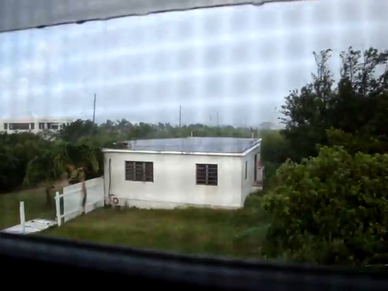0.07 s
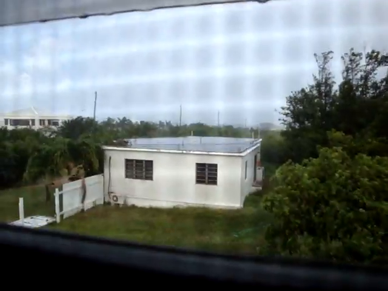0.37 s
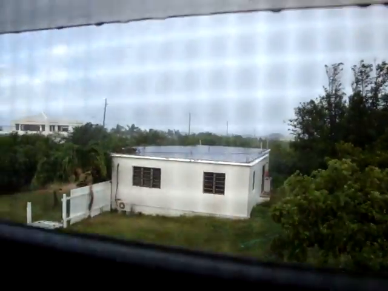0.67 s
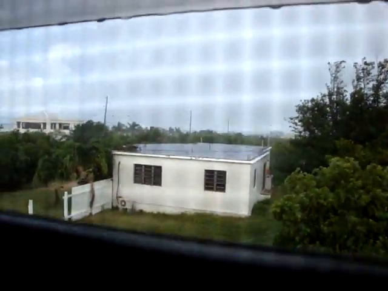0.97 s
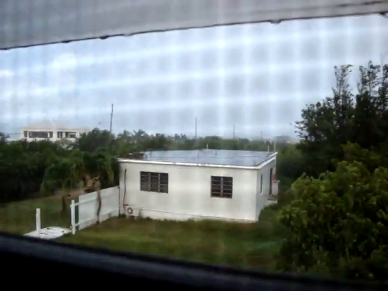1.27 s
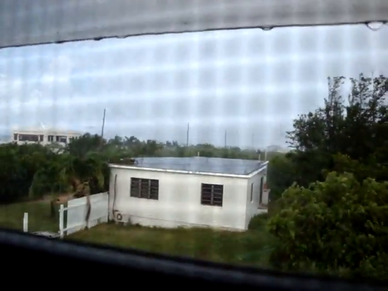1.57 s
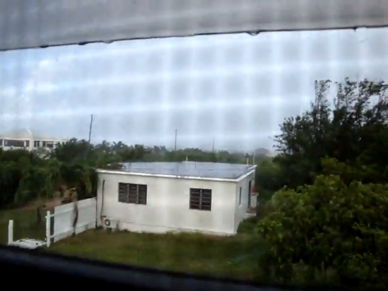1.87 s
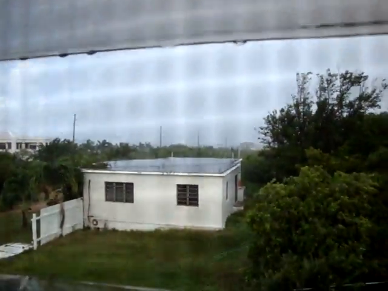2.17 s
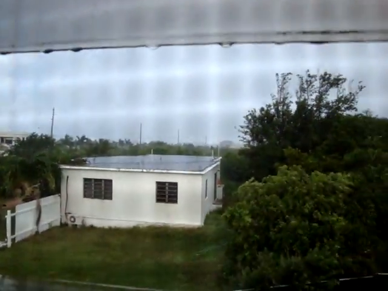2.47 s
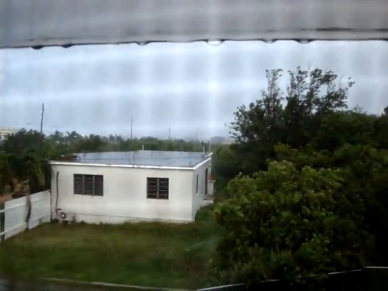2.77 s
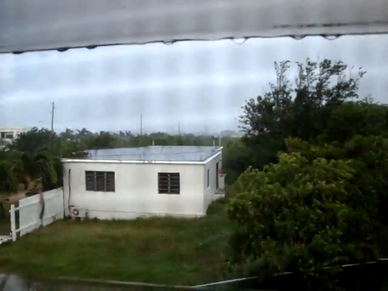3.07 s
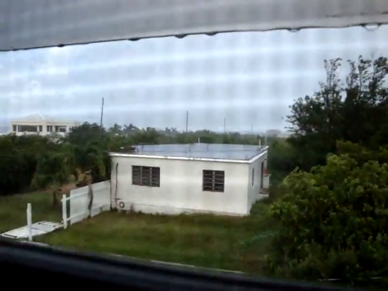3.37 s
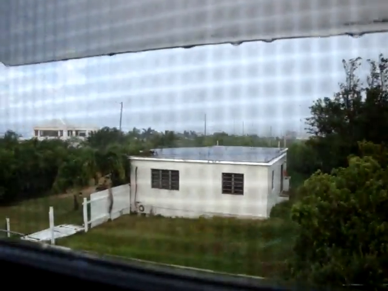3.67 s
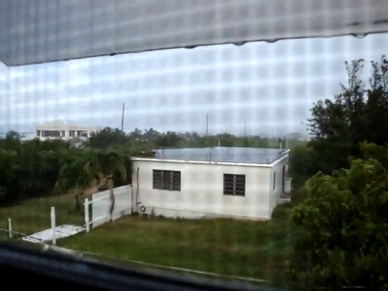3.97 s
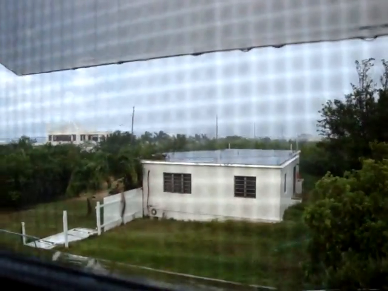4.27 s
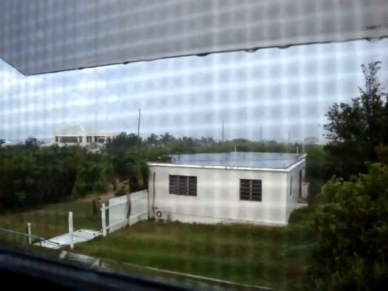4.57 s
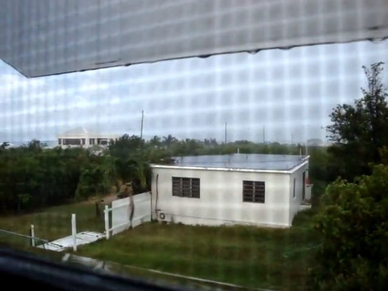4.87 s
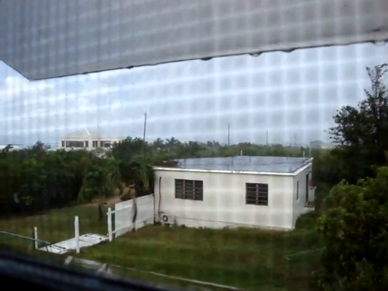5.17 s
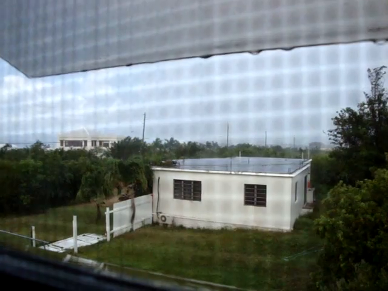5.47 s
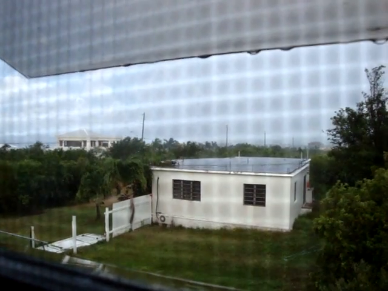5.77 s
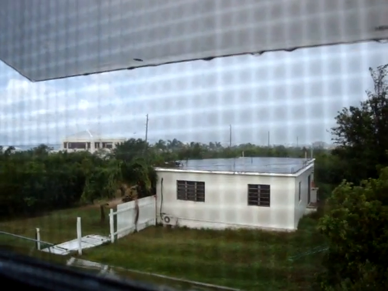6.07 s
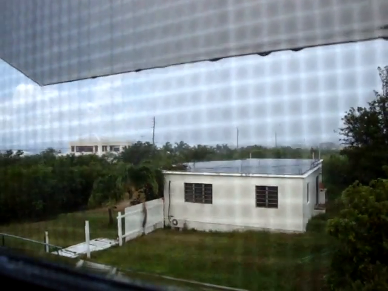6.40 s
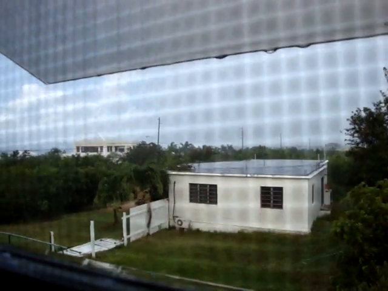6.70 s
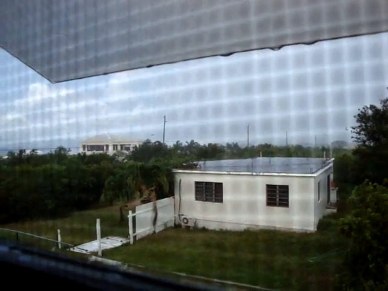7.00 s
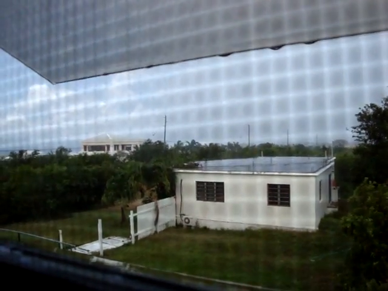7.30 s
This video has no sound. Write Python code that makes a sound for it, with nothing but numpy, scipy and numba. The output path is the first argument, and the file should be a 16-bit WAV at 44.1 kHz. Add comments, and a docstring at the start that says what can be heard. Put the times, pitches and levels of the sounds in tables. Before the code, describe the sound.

Steady rain falls on a lawn and trees, heard from an open window with a faint motor hum underneath. Early on, drops ping on a metal slat and the window gives a light tick. Gusts then buffet the microphone with low thumps and cracks, strongest at about two and a half seconds. In the lull the hum swells briefly and two more drops land, before weaker gusts return near the end.

```python
"""Steady rain on a garden and a faint motor hum in the room, heard at an open louvred window.
From 0.5 s a breeze shakes drops off the eave, ringing a metal slat; the frame ticks near 0.75 s.
Gusts buffet the microphone with thumps and cracks; the strongest, near 2.4 s, makes the recorder
turn its gain down for a moment. In the lull one hum line swells (3.9 s) and two heavy drops
strike the slat (5.3 s). Weaker gusts return from 6 s."""
import sys
import numpy as np
from scipy import signal
from scipy.fft import rfft, irfft
from scipy.io import wavfile
from scipy.ndimage import uniform_filter1d
from numba import njit

SR = 44100
rng = np.random.default_rng(int(sys.argv[2]) if len(sys.argv) > 2 else 0)


def int16_out(signal):
    """Quantize to a 16-bit WAV file."""
    q = np.round(np.clip(np.atleast_2d(signal).T, -1, 1) * 32767)
    wavfile.write(sys.argv[1], SR, q.astype(np.int16))


N = 323694
TIME = np.arange(N) / SR

# rain at the window (time [s], level [dB], boost of low roar and hum [dB])
RAIN_LEVELS = [(0, -32.5, 0.5), (1.0, -32.5, 1), (2.3, -31, 1), (3.45, -34.3, -0.5), (4.2, -33.5, 0.6),
               (7.3, -33.5, 1.4)]


def undb(db):
    """Decibels to gain."""
    return 10 ** (np.asarray(db) / 20)


def unit(x):
    """Scale to rms 1."""
    return x / np.sqrt(np.mean(x ** 2))


def add(out, start_s, sound):
    """Mix a sound in from start_s."""
    i = max(int(start_s * SR), 0)
    out[i:i + len(sound)] += sound[:max(N - i, 0)]


def along(curve):
    """Value columns of a (time, value, ...) table at every sample."""
    times_s, *columns = np.transpose(curve)
    return [np.interp(TIME, times_s, column) for column in columns]


def walk(per_s):
    """Random steps, smoothed twice; rms 1."""
    step = int(SR / per_s)
    held = np.repeat(rng.standard_normal(N // step + 1), step)
    return unit(uniform_filter1d(uniform_filter1d(held, step), step)[:N])


def impacts(per_s, spread_db):
    """Randomly timed clicks: many small, a few large."""
    hit = rng.random(N) < per_s / SR
    size = undb(spread_db * np.minimum(rng.exponential(size=N), 4))
    return hit * size * rng.choice([-1, 1], N)


def colour(x, points):
    """Filter by a (frequency [Hz], gain [dB]) curve."""
    hz, db = np.transpose(points)
    bins_hz = np.maximum(np.arange(N // 2 + 1) * SR / N, 1)
    return irfft(rfft(x) * undb(np.interp(np.log(bins_hz), np.log(hz), db)), N)


def band(x, hz, kind, order=2):
    """Butterworth low-, high- or band-pass."""
    return signal.sosfilt(signal.butter(order, hz, kind, fs=SR, output="sos"), x)


@njit
def moving_lowpass(x, hz, damping):
    """State-variable low-pass with a per-sample corner."""
    y, band_state, low_state = np.empty(len(x)), 0., 0.
    for i in range(len(x)):
        g = np.tan(np.pi * hz[i] / SR)
        bandpass = (band_state + g * (x[i] - low_state)) / (1 + g * (g + damping))
        y[i] = low_state + g * bandpass
        band_state, low_state = 2 * bandpass - band_state, 2 * y[i] - low_state
    return y


@njit
def follower(x, attack_s, release_s):
    """Attack/release envelope."""
    y, level = np.empty(len(x)), 0.
    for i in range(len(x)):
        level += (x[i] - level) / (SR * (attack_s if x[i] > level else release_s))
        y[i] = level
    return y


def rain():
    """Far drops merge into a wash; near ones patter on leaves, each with a short spray."""
    # rain on lawn and trees (frequency [Hz], gain [dB])
    spectrum = [(30, -37), (65, -31), (100, -23.5), (200, -16), (260, -6.5), (450, -5), (680, -2.5),
                (1050, -3.5), (1350, -6), (2500, -8.5), (3600, -11), (4400, -13.5), (5500, -15),
                (8000, -20.5), (10000, -26)]
    level_db, roar_db = along(RAIN_LEVELS)
    wash = rng.standard_normal(N) * undb(0.3 * walk(14))
    drops = impacts(per_s=900, spread_db=3.5)
    spray_s = .0016
    spray_power = signal.lfilter([1], [1, -np.exp(-1 / (spray_s * SR))], drops ** 2)
    spray = np.sqrt(spray_power) * rng.standard_normal(N)
    patter = band(unit(drops) + undb(4) * unit(spray), 1500, "high", order=1)
    sound = unit(colour(wash + undb(-6) * unit(patter), spectrum))
    roar = colour(sound, [(900, 6.5), (1700, -5.5), (3500, -31)])
    return (sound + (undb(roar_db) - 1) * roar) * undb(level_db)


def motor():
    """Motor and mains hum; higher lines waver more in pitch and level."""
    # hum lines (frequency [Hz], base level [dB])
    lines = [(80.8, -81), (120, -58.5), (136.7, -60.5), (161.5, -62), (241.5, -55.5), (485, -52.5),
             (566, -55), (647, -48.5), (728, -50.5), (745, -58), (810, -56)]
    # swells of the strongest line (centre [s], length [s], level [dB])
    swells = [(3.94, 0.21, -40)]
    out = np.zeros(N)
    strongest_hz = max(lines, key=lambda line: line[1])[0]
    for hz, db in lines:
        waver = hz / 650
        phase = 2 * np.pi * np.cumsum(hz * (1 + 0.00404 * waver * walk(12))) / SR
        level = undb(db - waver + 1.6 * waver * walk(7))
        if hz == strongest_hz:
            for centre_s, length_s, swell_db in swells:
                swell = undb(swell_db) * np.exp(-(2 * (TIME - centre_s) / length_s) ** 4)
                level = np.maximum(level, swell)
        out += np.sqrt(2) * np.sin(phase) * level
    _, boost_db = along(RAIN_LEVELS)
    return out * undb(boost_db)


def breeze():
    """Strength of the stirring air and rate of light drops off the eave, per sample."""
    # breezy spells (start [s], end [s], stir [dB], added drops [1/s])
    spells = [(.5, 2.9, -49.5, 30), (6.35, 7.4, -52, 4)]
    stir, drops_per_s = undb(-77.5), 3  # calm air
    for start_s, end_s, db, per_s in spells:
        blowing = uniform_filter1d(1. * ((TIME > start_s) & (TIME < end_s)), SR // 10)
        stir = stir + undb(db) * blowing
        drops_per_s = drops_per_s + per_s * blowing
    return stir, drops_per_s


def wind_force():
    """Each gust rises, flutters in ragged puffs and leaves a wake, over the wavering breeze."""
    # gusts on the microphone (start [s], hold [s], level [dB])
    gusts = [(0.215, 0.018, -36.5), (0.649, 0.066, -38), (0.958, 0.036, -24.5), (1.174, 0.13, -36.5),
             (1.422, 0.07, -19), (1.605, .03, -19.5), (1.678, 0.023, -29.5), (1.753, 0.048, -26),
             (1.865, 0.0049, -24), (1.905, 0.015, -25), (2.03, 0.032, -24.5), (2.152, 0.0096, -30.5),
             (2.269, 0.018, -21), (2.305, 0.088, -22.5), (2.411, 0.1533, -14), (2.604, 0.034, -22.5),
             (2.775, 0.12, -35.5), (3.574, 0.017, -42), (6.017, .045, -41), (6.383, 0.012, -33),
             (6.959, 0.1, -41.5), (7.088, 0.032, -35.5), (7.245, 0.069, -36)]
    attack_s, release_s, wake_s = .003, .0033, .13
    force = np.zeros(N)
    for start_s, hold_s, db in gusts:
        early_s = np.maximum(start_s - TIME, 0)
        late_s = np.maximum(TIME - start_s - hold_s, 0)
        force += undb(db) * np.exp(-early_s / attack_s - late_s / release_s)
    wake = undb(-13.5) * uniform_filter1d(force, int(wake_s * SR))
    stir = breeze()[0] * undb(4 * walk(22))
    flutter = undb(2.45 * walk(130))
    return force * flutter + wake + stir


def turbulence(force):
    """Air churns at the microphone port: a harder gust is louder and brighter."""
    corner_hz = np.clip(480 * (force / undb(-11.5)) ** 0.28, 80, 620)
    churn = moving_lowpass(rng.standard_normal(N), corner_hz, damping=1.0)
    churn = band(churn / np.sqrt(corner_hz), 1450, "low")
    # faster air holds less of the slowest swirls
    slow_swirls = moving_lowpass(churn, corner_hz / 2, damping=np.sqrt(2))
    churn = band(churn - slow_swirls, 70, "high", order=3)
    churn /= np.sqrt(uniform_filter1d(churn ** 2, SR // 40))
    return band(force * churn, 45, "high")


def eddy(db, hz):
    """One push and pull, centred in 20 ms; a hard one overloads the capsule with a crack."""
    overload_db, crack_s = 0.5, 0.00022
    t = TIME[:SR // 50] - 0.01
    phase = 2 * np.pi * hz * t
    swing = undb(db) * phase * np.exp((1 - phase ** 2) / 2)
    overload = max(undb(db) - undb(overload_db), 0)
    crack = 0.9 * overload * np.sign(t) * np.exp(-np.abs(t) / crack_s)
    return swing + crack


def eddies(force):
    """Small eddies arrive at random, scaled by the wind; a few hard ones thump on the port."""
    # hardest eddies (centre [s], level [dB], frequency [Hz])
    thumps = [(0.9821, -10.5, 282), (1.234, -18.5, 215), (1.4357, 2.5, 398), (1.5946, -8, 380),
              (1.6218, 0.5, 330), (2.0405, -9.5, 520), (2.0479, -5, 400), (2.2821, -2, 270),
              (2.3104, -3.5, 650), (2.378, -8.5, 470), (2.4395, -3, 280), (2.4507, 4.5, 420),
              (2.4703, 0, 650), (2.5346, -6, 550), (2.555, -0.5, 670), (7.1027, -24, 220),
              (7.27, -10.5, 232)]
    arrivals = undb(5) * force * impacts(per_s=55, spread_db=0.7)
    out = signal.fftconvolve(arrivals, eddy(db=0, hz=440), "same")
    for centre_s, db, hz in thumps:
        thump = eddy(db, hz)
        add(out, centre_s - len(thump) / SR / 2, thump)
    return band(out, 84, "high")


def slat():
    """Drops strike the loose metal slat, which rings and rattles under the splash."""
    # slat modes (frequency [Hz], level [dB], t60 [s])
    modes = [(1596, -3.5, 0.047), (2163, 3, 0.086), (2795, 1, 0.054), (3620, -5.5, 0.074),
             (3640, -13.5, .05), (4270, -12, .06), (4360, -7.5, .06), (5200, -11.5, .045),
             (5060, -19.5, 0.033), (5870, -19.5, .05), (7900, -17, .04)]
    # heavy drops from the eave (time [s], level [dB])
    drips = [(.693, -29.5), (.734, -31), (.853, -26), (.99, -32), (1.05, -32), (1.11, -27.5), (1.839, -25),
             (1.966, -27), (2.106, -30), (2.675, -21), (3.075, -26.5), (3.105, -26), (5.275, -26),
             (5.391, -32.5)]
    splash_rise_s, splash_decay_s = 0.0013, 0.019
    t = TIME[:SR // 4]
    hits = undb(-36.5) * impacts(per_s=breeze()[1], spread_db=0.5)  # light drops
    for time_s, db in drips:
        add(hits, time_s, [undb(db)])
    spray = (np.exp(-t / splash_decay_s) - np.exp(-t / splash_rise_s)) ** 2
    splash_power = np.abs(signal.fftconvolve(hits ** 2, spray / spray.sum())[:N])
    splash = np.sqrt(splash_power) * rng.standard_normal(N)
    response = sum(undb(db - 60 * t / t60_s) * np.sin(2 * np.pi * hz * t) for hz, db, t60_s in modes)
    ring = signal.fftconvolve(undb(-8.5) * hits + undb(-10) * splash, response)[:N]
    rattle = undb(3.5 * walk(220))
    return ring * rattle + undb(19.5) * band(splash, [1400, 5000], "band")


def frame_taps():
    """Short dry knocks of the window frame."""
    # light taps (time [s], level [dB], frequency [Hz])
    taps = [(0.7348, -20, 1160), (.739, -24, 900), (0.794, -14, 1090)]
    decay_s = 0.0013
    out, t = np.zeros(N), TIME[:SR // 20]
    for time_s, db, hz in taps:
        knock = np.sin(2 * np.pi * hz * t) + 0.82 * rng.standard_normal(len(t))
        add(out, time_s, undb(db) * knock * np.exp(-t / decay_s))
    return band(out, 4800, "low")


def scene():
    """All sources meet at one microphone."""
    force = wind_force()
    mix = rain() + motor() + turbulence(force) + eddies(force) + slat() + frame_taps()
    return np.tile(mix, (2, 1))


def record(dry):
    """Mono recorder: loud wind pulls the gain down, peaks overload, the top is cut."""
    threshold_db, ceiling, top_hz = -17, 0.72, 9950
    open_s, fade_s = 0.036, 0.009
    x = dry[0]
    rms = np.sqrt(np.abs(uniform_filter1d(x ** 2, SR // 100)))
    excess = np.maximum(rms / undb(threshold_db) - 1, 0)
    x = x / (1 + 0.74 * follower(excess, attack_s=0.073, release_s=0.38))
    x = x / (1 + (x / ceiling) ** 10) ** (1 / 10)  # soft clip
    x = x * np.clip((TIME - open_s) / fade_s, 0, 1) ** 3  # input opens
    x = signal.sosfilt(signal.ellip(12, .1, 70, top_hz, fs=SR, output="sos"), x)
    return np.tile(x, (2, 1))


dry = scene()
out = record(dry)
int16_out(out)
```